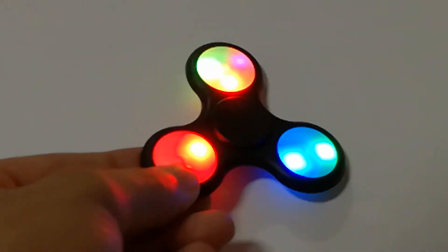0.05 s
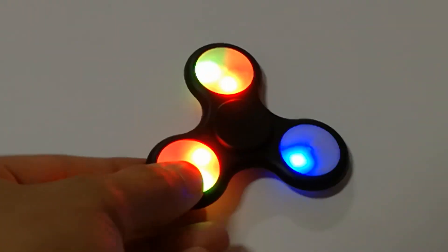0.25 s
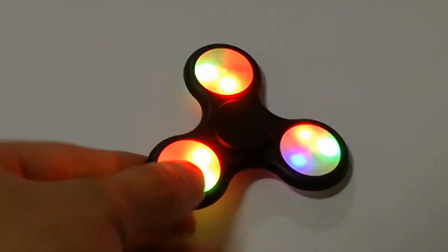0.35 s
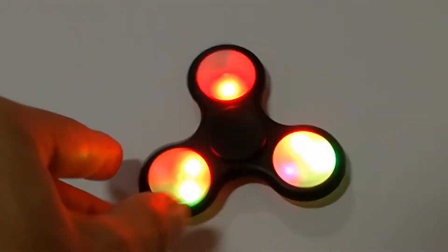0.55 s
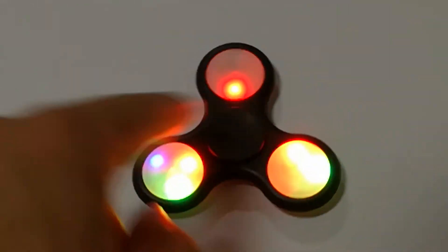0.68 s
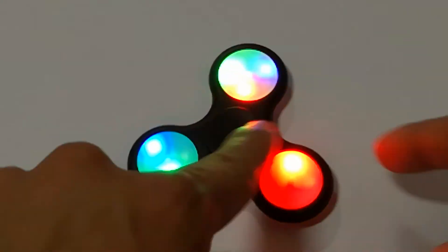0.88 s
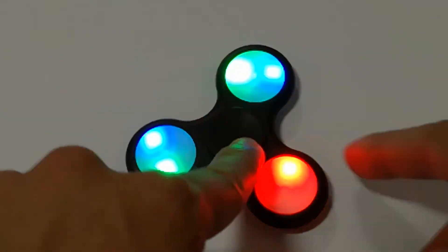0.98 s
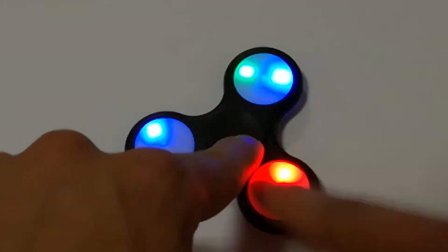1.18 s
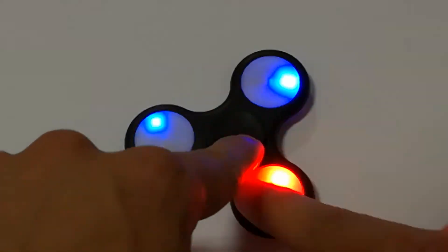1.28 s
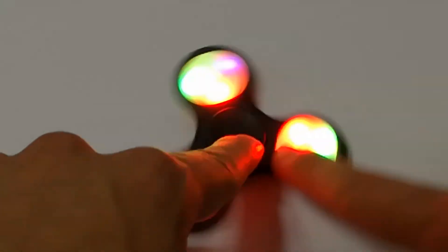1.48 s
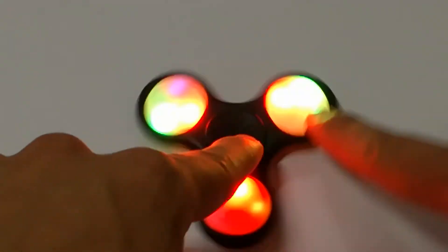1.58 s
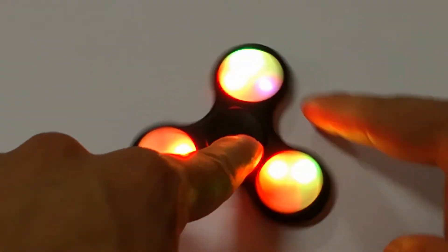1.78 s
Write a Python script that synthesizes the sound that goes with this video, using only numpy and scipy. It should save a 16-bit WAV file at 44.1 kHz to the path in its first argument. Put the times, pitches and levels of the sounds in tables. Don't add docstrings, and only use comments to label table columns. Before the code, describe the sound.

Loose bearing balls clatter inside a plastic spinner for about a third of a second, with table bumps underneath and a short room tail; faint hiss and a low outside engine continue, heard closely in stereo.

```python
import sys
import numpy as np
from scipy import signal
from scipy.fft import rfft, irfft
from scipy.io import wavfile
from scipy.ndimage import uniform_filter1d

SR = 44100
rng = np.random.default_rng(int(sys.argv[2]) if len(sys.argv) > 2 else 0)


def wav_out(sig):
    wavfile.write(sys.argv[1], SR, np.round(np.clip(np.atleast_2d(sig).T, -1, 1) * 32767).astype(np.int16))


def ratio(d):
    e = np.asarray(d, float) / 20
    return 10 ** e


N = 81585

# [t/s, firing rate f/Hz, level/dB]
ENGINE_PASS = [(0.0, 62.3, -73.5), (.086, 62.5, -77.5), (.138, 60.7, -63), (.21, 61.25, -54),
               (.416, 61.07, -48.5), (.534, 60.44, -52), (.576, 61.34, -73), (.618, 60.62, -57),
               (.68, 60.2, -53.5), (.71, 59.3, -46), (.756, 58.32, -44), (.864, 57.25, -40.5),
               (1.128, 57.24, -41.5), (1.478, 56.45, -51.5), (1.648, 53.3, -63.5), (1.762, 53.44, -62),
               (1.782, 53.2, -66.5), (1.85, 52.9, -75.5)]
# [f/Hz, level/dB, time to fall 60 dB t/s]
SHELL_MODES = [(1704, -24.5, 0.013), (3300, -27.5, 0.0047), (4534, -12.5, 0.013), (5460, -8.5, 0.011),
               (5960, 5, 0.0094), (6200, -2, 0.014), (6270, -4.5, 0.012), (7110, -6.5, 0.016),
               (7800, -13.5, 0.0067), (9300, -12, .006), (10350, 4.5, 0.015), (11450, -1.5, .005),
               (13500, -8.5, .004)]
SHELL_RISE_S, CLACK_TREBLE_DB, CHATTER_DB = 0.0004, -28.5, -13.5


def evened(x):
    return x / np.sqrt(np.mean(x ** 2) + 1e-20)


def read(points, hz):
    f, value = np.transpose(points)
    return np.interp(np.log(hz + 1), np.log(f + 1), value)


def curve(table, col=1):
    rows = np.array(table)
    return np.interp(np.arange(N) / SR, rows[:, 0], rows[:, col])


def bump(centre_s, width_s):
    t = np.arange(N) / SR
    return np.exp(-((t - centre_s) / width_s) ** 2)


def add(mix, s, sound):
    part = mix[round(s * SR):][:len(sound)]
    part += sound[:len(part)]


def noise(shape, patch_db, size=1024):
    hop = size // 4
    frames, hz = N // hop + 5, np.fft.rfftfreq(size, 1 / SR)
    real, imag, patch = rng.standard_normal((frames, len(hz), 3)).T
    patch = uniform_filter1d(patch, size=5, axis=0)
    patch = evened(uniform_filter1d(patch, size=6, axis=1))
    db = read(shape, hz) - 60 * (hz < 0.8 * shape[0][0])
    z = (real + 1j * imag) * ratio(db[:, None] + patch_db * patch)
    return evened(signal.istft(z, nperseg=size, noverlap=size - hop)[1][:N])


def hiss():
    # [f/Hz, level/dB]
    mid_colour = [(250, -4), (545, -19.5), (700, -10.5), (2000, -17), (5400, -28), (9500, -34.5),
                  (13600, -36.5), (15000, -27.5)]
    # [f/Hz, level/dB]
    side_colour = [(100, -19), (330, -5.5), (450, -7.5), (780, 1), (1400, -9), (2200, -10.5),
                   (13600, -29.5), (15000, -20)]
    low_colour = [(20, -7.0), (70, -0.5), (200, -9.5), (400, -24.5), (800, -46.0)]
    whine_hz = 9790
    whine_colour = [(whine_hz - 150, -30), (whine_hz, 0), (whine_hz + 150, -30), (whine_hz + 300, -70)]
    engine_db = uniform_filter1d(curve(ENGINE_PASS, col=2), size=12000)
    lift = ratio(0.12 * (engine_db + 44))
    mid = ratio(-76) * noise(mid_colour, 2.4)
    mid = mid + ratio(-75) * noise(low_colour, 1.2, size=2048)
    mid = mid + ratio(-101) * noise(whine_colour, 3.0)
    side = ratio(-76) * noise(side_colour, 2.2)
    return lift * np.array([mid + side, mid - side])


def waver():
    drift = uniform_filter1d(rng.standard_normal(N), size=700)
    return 1 + 0.062 * evened(uniform_filter1d(drift, size=700))


def engine():
    # [t/s, level/dB]
    half_swell = [(0.0, -96.5), (.34, -76), (.628, -72), (.82, -61), (.97, -59.5), (1.324, -60),
                  (1.5, -78.5), (1.74, -67), (1.85, -90.5)]
    # [multiple of the firing rate, level/dB]
    orders = [(1.5, -31), (2.01, -28), (3.08, -29)]
    # [f/Hz, level/dB]
    rumble_colour = [(42, -25), (72, -7.5), (87, -5.5), (298, -33.5), (328, -25.5), (405, -63), (500, -39),
                     (650, -94.5), (1100, -120)]
    # [t/s, level/dB]
    rumble_swell = [(0, -16), (.3, -7.5), (.6, -1.5), (.72, -3.5), (.93, -2), (1.08, 3.5), (1.2, -1),
                    (1.4, 1.5), (1.52, -2.5), (1.68, -11), (1.85, -11.5)]
    side_colour = [(50, -1), (150, 1.5), (400, -2.0), (1000, -34)]
    turns = 2 * np.pi * np.cumsum(curve(ENGINE_PASS)) / SR
    tone = np.sin(turns) * waver()
    for multiple, db in orders:
        tone += ratio(db) * np.sin(multiple * turns) * waver() ** 4
    half = ratio(curve(half_swell)) * np.sin(0.53 * turns)
    drone = 2 ** 0.5 * (ratio(curve(ENGINE_PASS, col=2)) * tone + half)
    swell = ratio(-60 + curve(rumble_swell))
    mid = drone + swell * noise(rumble_colour, 2.5, size=2048)
    side = swell * ratio(-17) * noise(side_colour, 3.9, size=2048)
    return np.array([mid + side, mid - side])


def ring(modes, chance, centre_hz, treble_db, pitch, rise_s):
    hz, db, t60 = np.transpose(modes)[:, :, None]
    strength, detune, phase = chance[:len(hz)].T[:, :, None]
    t = np.arange(round(t60.max() * SR)) / SR
    lean = np.clip(np.log2(hz / 6000) / 0.12, -1, 1) * (hz > 5000)
    tilt_db = 70 * np.log2(centre_hz / 6050) * lean
    db = db + np.where(hz > 8500, treble_db, tilt_db) + 1.5 * strength
    hz = hz * np.where((hz > 5600) & (hz < 6700), (centre_hz / 6050) ** 0.7, 1)
    fade_db = -60 * t * pitch ** 2 / t60
    cycles = hz * pitch * (1 + 0.008 * detune) * t + 0.4 * phase
    x = (ratio(db + fade_db) * np.sin(2 * np.pi * cycles)).sum(0)
    x = x * np.sin(np.pi / 2 * np.minimum(t / rise_s, 1)) ** 2
    return x / abs(x).max()


def knocks():
    # [t/s, peak level/dB, pitch factor]
    bumps = [(.056, -66, 2.8), (0.176, -66, 1.08), (0.436, -53.5, 1.05), (.447, -48, 0.96),
             (0.483, -58, 1.0), (.536, -62.5, 2.3), (0.544, -50, .9), (0.576, -58, 0.92),
             (.608, -51.5, 1.0), (.645, -57, 1.0), (1.755, -67, .62)]
    # [f/Hz, level/dB, time to fall 60 dB t/s]
    table_modes = [(165, -9.5, .04), (247.4, 1.5, 0.058), (353.2, 1.5, 0.14), (484, -20.5, 0.031),
                   (1040, -20.5, 0.023)]
    out = np.zeros(N)
    chances = rng.standard_normal((len(bumps), len(table_modes), 3))
    for (s, db, pitch), chance in zip(bumps, chances):
        add(out, s, ratio(db + 2) * ring(table_modes, chance, 6050, 0, pitch, 0.0024))
    return out


def clacks():
    # [t/s, peak level/dB, centre f/Hz, treble level/dB]
    clear = [(0.4477, -26, 5700, -27.5), (0.4542, -28.5, 5530, -34), (0.4574, -40.5, 6340, -35.5),
             (0.463, -28.5, 5740, -25.5), (0.4669, -34, 6300, -30.5), (0.4734, -30, 6180, -29),
             (0.4798, -34.5, 5880, -25), (0.4853, -35, 5740, -24), (0.4892, -31.5, 6020, -26.5),
             (0.4923, -38.5, 5910, -26), (0.497, -31.5, 5930, -29), (0.5038, -36, 6140, -27.5),
             (0.5099, -36.5, 6100, -30), (0.5158, -43, 5840, -27), (0.5226, -42, 5700, -27.5),
             (0.5397, -22, 6180, -26.5), (0.5481, -31.5, 6250, -37), (0.5515, -28, 5960, -25),
             (0.5558, -37, 5960, -30.5), (0.5603, -31.5, 5900, -33), (0.5692, -29.5, 5960, -26),
             (0.5751, -32.5, 5930, -27), (0.5779, -25.5, 6100, -20.5), (0.5819, -37, 6020, -20),
             (0.5897, -32.5, 6100, -22.5), (0.5943, -28, 6160, -28.5), (0.6016, -40.5, 6340, -25),
             (0.6055, -24.5, 5970, -26.5), (0.608, -27, 6200, -21), (0.6196, -38, 5860, -28),
             (0.626, -25, 6160, -20), (0.6312, -40.5, 6130, -21), (0.6371, -37, 6170, -17),
             (0.6403, -28, 5980, -25), (0.6471, -28.5, 6020, -23.5), (0.6532, -42.5, 5980, -27),
             (0.6581, -31.5, 5960, -24.5), (0.6633, -28, 6190, -32), (0.6738, -28, 6140, -22),
             (0.6802, -38.5, 6300, -26), (0.6849, -34, 6320, -27), (0.6877, -43, 6100, -22.5),
             (0.691, -44, 6100, -22), (0.6939, -40, 6080, -31), (0.7064, -35, 5950, -27.5),
             (0.7118, -39.5, 5960, -30.5), (0.7151, -46, 5950, -23), (0.7216, -43.5, 6160, -26)]
    # [t/s, peak level/dB, centre f/Hz,
    # treble level/dB]
    faint = [(.174, -68, 7100, -2), (0.1963, -57.5, 6510, -7), (0.2002, -56, 6730, -20),
             (.2045, -63.5, 6200, -25), (0.44, -45, 6280, -17), (0.4705, -31, 5700, -25.5),
             (0.735, -61, 6200, -30), (.918, -58.5, 6514, -34), (.94, -75, 6295, -33),
             (.952, -75, 6370, -32), (1.218, -73, 6300, -20), (1.245, -67, 6500, -3),
             (1.568, -74, 6000, -30), (1.578, -68, 6000, -30)]
    out, snaps = np.zeros((2, N))
    blows = list(clear) + list(faint)
    snap = np.exp(-np.arange(400) / SR / 0.002)
    chances = rng.standard_normal((len(blows), len(SHELL_MODES), 3))
    for (s, db, centre_hz, treble_db), chance in zip(blows, chances):
        blow = ring(SHELL_MODES, chance, centre_hz, treble_db, 0.99, SHELL_RISE_S)
        add(out, s, ratio(db - 6.5) * blow)
        add(snaps, s, ratio(db + treble_db - 15) * snap)
    return out, snaps


def shaking():
    # [t/s, level/dB]
    shake = [
        (.436, -57.5),
        (.45, -58),
        (.50, -44),
        (.535, -48.5),
        (.545, -51),
        (.60, -44.5),
        (.68, -49),
        (.72, -56),
        (.77, -70),
    ]
    t = np.arange(N) / SR
    fade = ratio(-130 * np.maximum(t - shake[-1][0], 0))
    return ratio(curve(shake)) * (t > shake[0][0]) * fade


def chatter(shake):
    hits_per_s, spread_db = 1000, 1.5
    size = ratio(spread_db * np.minimum(rng.exponential(1, N), 4))
    size = size * (rng.random(N) < hits_per_s / SR)
    chances = rng.standard_normal((16, len(SHELL_MODES), 3))
    kind = rng.integers(0, len(chances), N)
    out = np.zeros(N)
    for k, chance in enumerate(chances):
        hit = ring(SHELL_MODES, chance, 5900 + 30 * k, CLACK_TREBLE_DB, 1, SHELL_RISE_S)
        out += signal.oaconvolve(size * (kind == k), hit)[:N]
    roll = ratio(-87 - CHATTER_DB) * bump(1.57, 0.034)
    return (shake + roll) * ratio(CHATTER_DB) * evened(out)


def scrape(follow):
    # [f/Hz, level/dB]
    colour = [(700, -6.5), (1700, -4.5), (3300, 1), (4500, -10), (7500, -3.5), (9000, -7.5), (15500, -30)]
    return ratio(-24) * follow * noise(colour, 3.3, size=256)


def rub(shake):
    return ratio(-16.5) * shake * noise([(200, -7.0), (350, -12.5), (430, -14), (900, -43.5)], 2.5)


def fizz(follow, snaps):
    t = np.arange(N) / SR
    dull = ratio(-14.5 * (t > 0.43) * (t < 0.58))
    strength = ratio(-36) * bump(0.63, 0.0603) * follow + snaps * dull
    colour = [(8500, -3.5), (13000, 3), (15500, -9.0)]
    return np.array([ratio(side_db) * strength * noise(colour, 3.0, size=256) for side_db in (4, 1.5)])


def rattle():
    hits, snaps = clacks()
    shake = shaking()
    follow = shake + 1.3 * np.sqrt(abs(uniform_filter1d(hits ** 2, size=130)))
    toy = hits + chatter(shake) + scrape(follow) + rub(shake)
    return toy, fizz(follow, snaps)


def room(x):
    # [f/Hz, time to fall 60 dB t/s]
    decay = [(300, 1), (3500, 0.3), (5000, 0.34), (6100, 0.45), (7300, 0.34), (9000, 0.18)]
    # [delay t/s, left level/dB, right level/dB]
    echoes = [(.0016, -6, -14), (.0031, -12, -14), (.0047, -12, -17), (.0072, -15, -17)]
    taps = np.zeros((2, SR))
    at = np.arange(300, SR - 20, 20) + rng.integers(0, 20, (2, (SR - 301) // 20))
    np.put_along_axis(taps, at, rng.choice([-1., 1.], at.shape), 1)
    hz, t, z = signal.stft(taps, SR, nperseg=256)
    fade = ratio(-60 * t / np.maximum(read(decay, hz), 0.05)[:, None])
    tail = signal.istft(z * fade, SR, nperseg=256)[1][:, :SR]
    tail = ratio(-13 + np.array([[-1.0], [3.5]])) * tail / np.linalg.norm(tail[0])
    f = np.fft.rfftfreq(SR, 1 / SR)

    def late(s):
        return np.exp(-2j * np.pi * f * s)

    left_echoes = sum(ratio(left_db) * late(s) for s, left_db, right_db in echoes)
    right_echoes = sum(ratio(right_db) * late(s * 0.93) for s, left_db, right_db in echoes)
    left = ratio(-1) * late(0.00009) * (1 + left_echoes)
    right = 1 + right_echoes
    port = 1 + (ratio(9) - 1) / (1 + ((f - 6100) / 2700 * 2) ** 2)
    same = 1 / (1 + (f / 353) ** 4)
    left = same * right + (1 - same) * left
    direct = np.array([left, port * right]) * late(64 / SR)
    paths = irfft(direct + (1 - 0.58 * same) * rfft(tail), SR)
    return signal.fftconvolve(x[None], paths, axes=1)[:, 64:N + 64]


def scene():
    background = hiss() + engine()
    bumps = knocks()
    toy, bright = rattle()
    return background + room(toy + bumps) + bright


def band_limit(x):
    return signal.sosfilt(signal.butter(12, 16380, fs=SR, output="sos"), x)


def record(dry):
    edge = signal.firwin(511, 15750, window=("kaiser", 7), fs=SR)
    mix = signal.oaconvolve(dry, edge[None], "same")
    return band_limit(mix)


dry = scene()
out = record(dry)
wav_out(out)
```